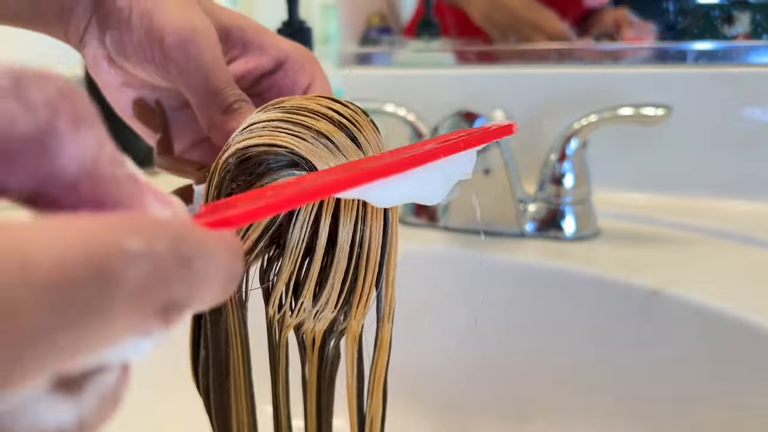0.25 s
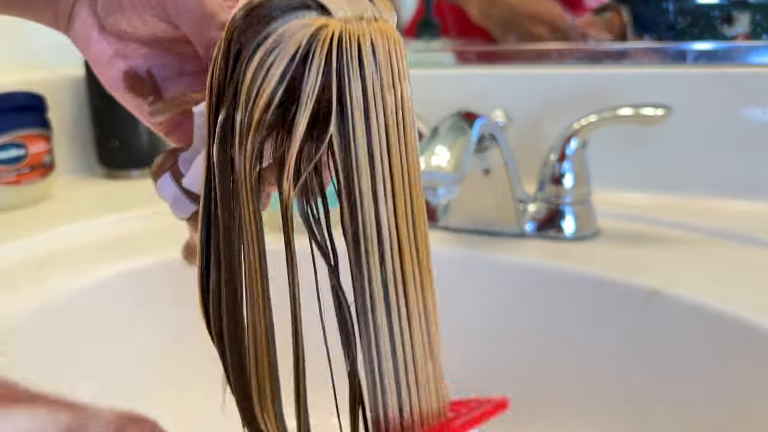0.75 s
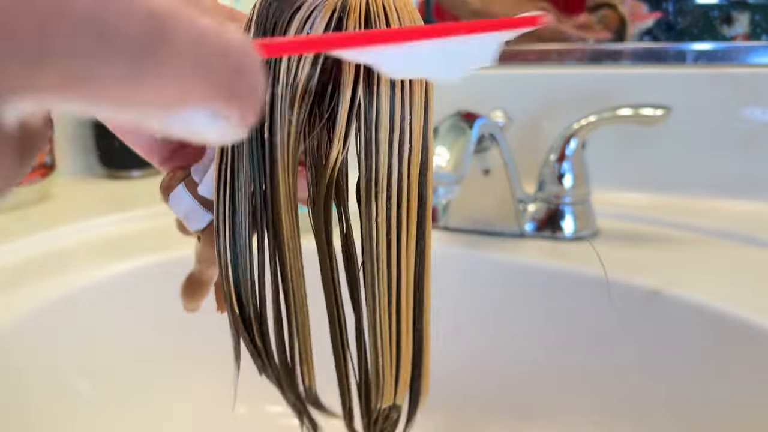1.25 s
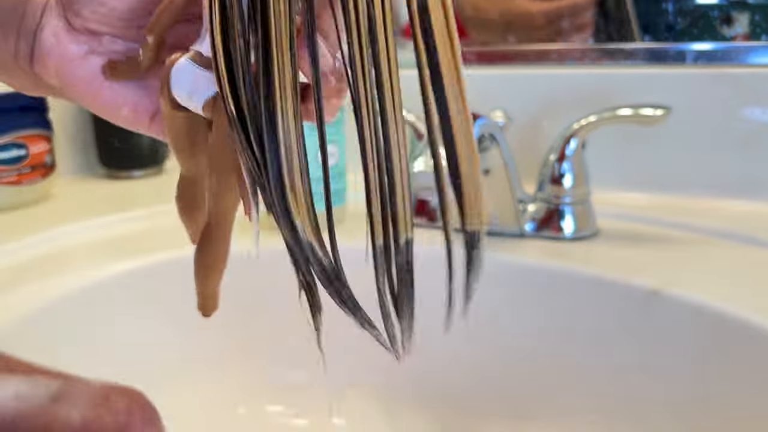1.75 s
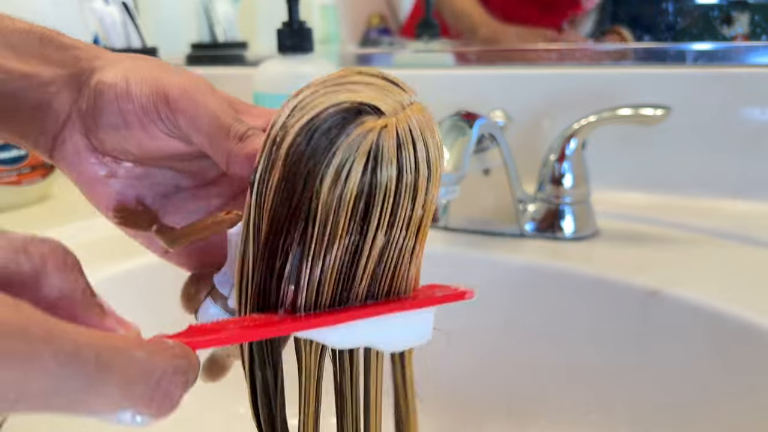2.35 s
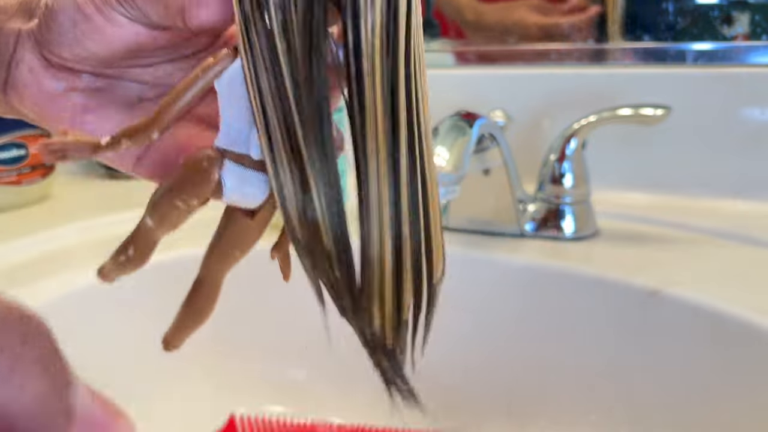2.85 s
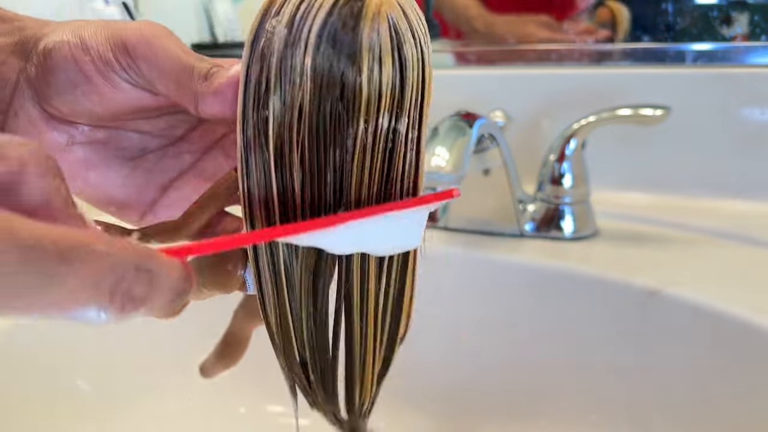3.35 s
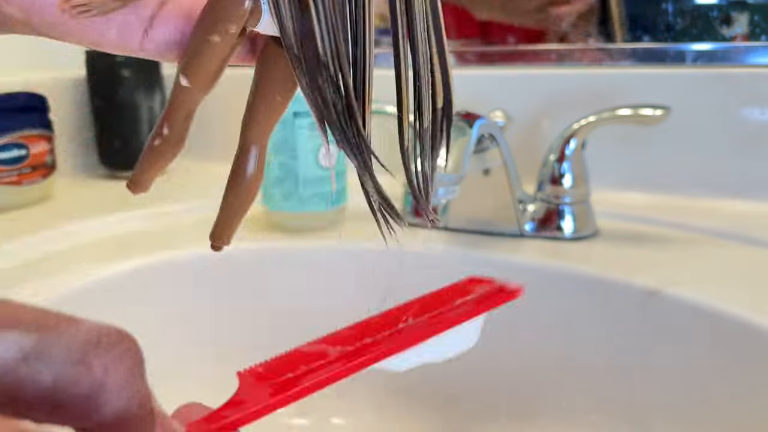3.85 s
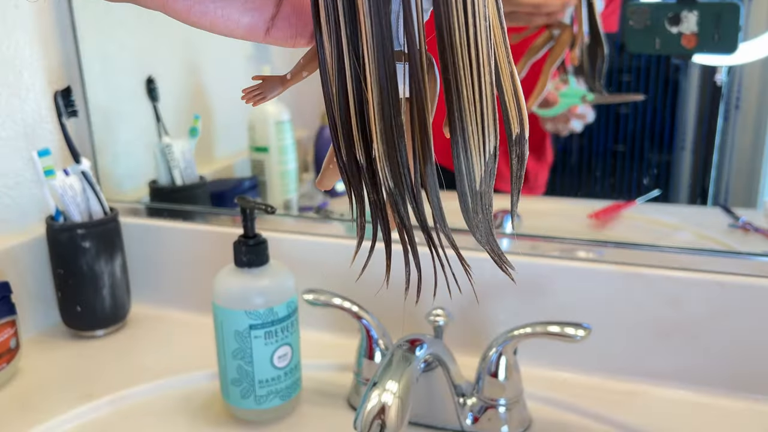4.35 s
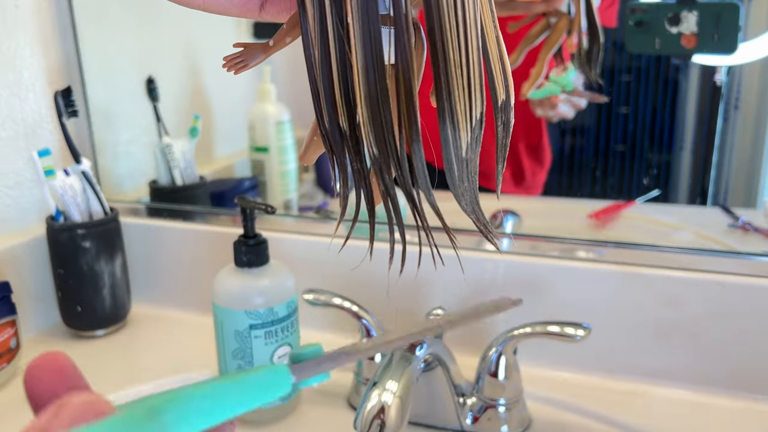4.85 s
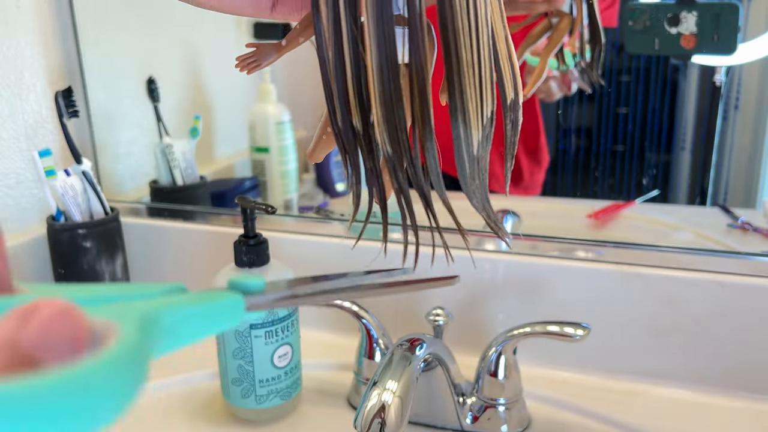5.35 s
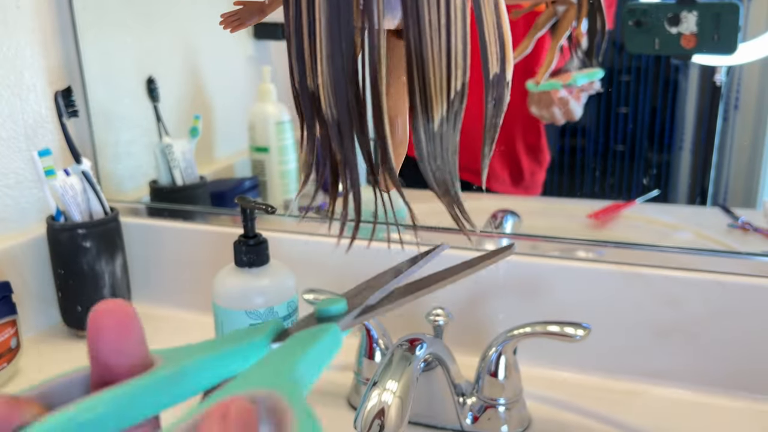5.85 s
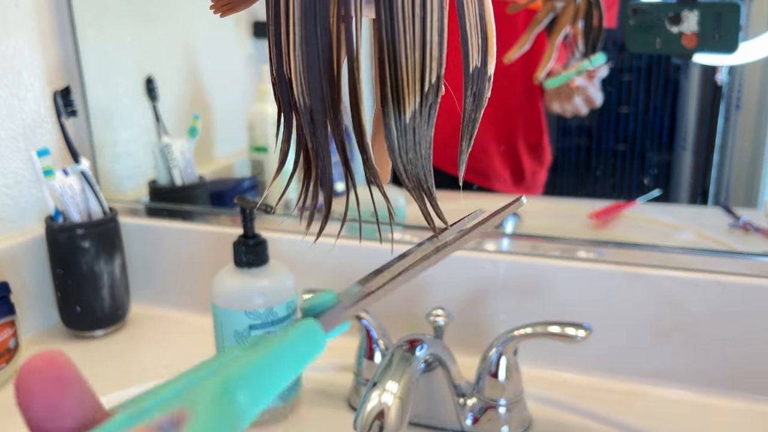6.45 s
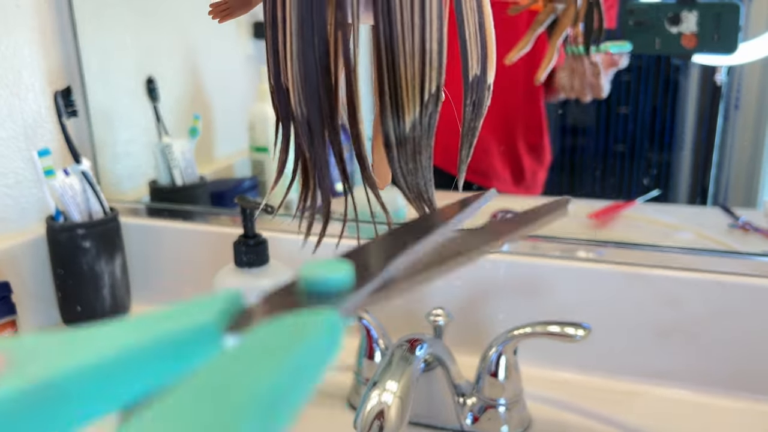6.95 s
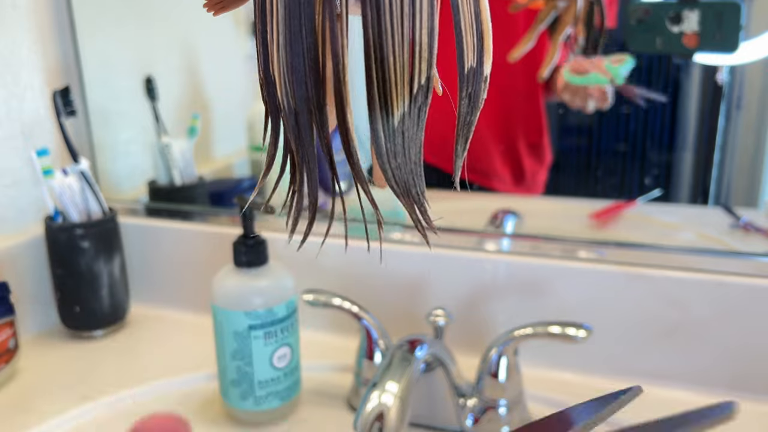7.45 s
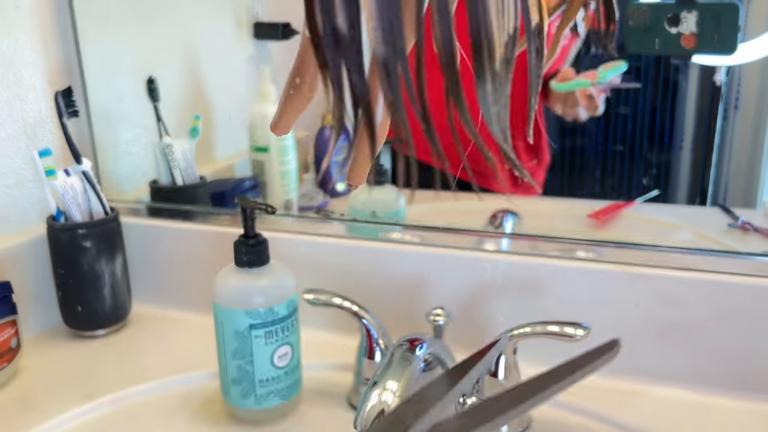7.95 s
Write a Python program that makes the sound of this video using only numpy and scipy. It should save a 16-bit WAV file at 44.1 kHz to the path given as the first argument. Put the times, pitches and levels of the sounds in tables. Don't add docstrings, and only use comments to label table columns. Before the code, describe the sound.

Close stereo phone microphone at a sink, treble leaning left, with airy hiss. Wet synthetic hair fizzes past comb teeth in four strokes, each beginning with crackly snags and swelling into a long swish. A sudden cut raises the low drone. Steel scissors then rub, click open and snip crisply three times, dry and very short, with handle creaks. Near the end, a low thump leads into a brief muffled rumble.

```python
import sys
import numpy as np
from scipy import signal
from scipy.fft import rfft, irfft, next_fast_len
from scipy.io import wavfile
from scipy.ndimage import uniform_filter1d

SR = 44100
rng = np.random.default_rng(int(sys.argv[2]) if len(sys.argv) > 2 else 0)


def master(y):
    cut = np.clip(np.atleast_2d(y).T, -1, 1)
    pcm = np.round(cut * 32767)
    wavfile.write(sys.argv[1], SR, pcm.astype(np.int16))


def makeup_ratio(level_db):
    decades = np.asarray(level_db, float) / 20
    return 10 ** decades


N = 361175
T = np.arange(N) / SR

CHANGE_S = 3.915
GAP_S = (.085, .128, .158, .195)

# (frequency [Hz], width [Hz], level [dB])
HUM_MODES = [
    [(32, 5.2, -19), (57.2, 15, -6.5), (79, 13, -10.5), (98, 3.4, -25), (117.8, 8.6, 5.5),
     (139.3, 12.5, -6), (178, 46, -34.5), (263, 49, -40.5)],
    [(66, 12, -25.5), (101.3, 27, -13), (123.1, 18, -10.5), (166.7, 16, -10), (215.3, 12, -11),
     (243, 10, 2), (273.8, 18, -8.5), (324, 25, -26.5)],
]
# (time [s], level [dB])
HUM_LEVEL = [
    [(0, -50), (.25, -47.5), (.55, -51), (1.2, -47.5), (1.85, -52), (2.2, -50), (3.0, -47.5), (3.6, -51),
     (3.8, -48.5)],
    [(3.92, -49.5), (4.9, -48.5), (5.15, -49.5), (5.45, -47.5), (6.2, -50), (6.85, -49.5), (7.0, -51),
     (7.55, -45), (8.19, -45)],
]
# (frequency [Hz], level [dB per Hz])
AIR_COLOUR = [
    [(120, -22), (200, -0.5), (294, -1.5), (387, -8), (696, -16), (968, -20), (1350, -24.5), (2090, -26.5),
     (2330, -28.5), (10100, -31.5), (16000, -30.5)],
    [(200, -26.5), (330, -10), (600, -10), (960, -22), (1600, -26), (3000, -33), (5200, -37.5),
     (10000, -40.5), (16000, -41.5)],
]
AIR_DB = -78, -73.5
# (frequency [Hz], likeness [0 to 1])
LIKENESS = [(60, 0.68), (180, 0.79), (550, 0.66), (1650, 0.14), (4970, 0.09), (15000, 0.45)]

# (time [s], peak [dB], frequency [Hz], time to fade by 60 dB [s])
THUMPS = [
    (5.17, -32.5, 86.5, .3),
    (7.479, -28.5, 91.8, 0.44),
]
# (time [s], level [dB])
RUMBLE = [
    (7.48, -76.5),
    (7.627, -51.5),
    (7.66, -58.5),
    (7.7, -52.5),
    (7.96, -54),
    (8.171, -59),
]
# (time [s], level [dB])
RUMBLE_TREBLE = [
    (7.62, -26.5),
    (7.82, -19.5),
    (8.17, -29),
]
# (frequency [Hz], width [Hz], level [dB])
WALL_MODES = [(225.2, 62, -2), (338.8, 7.6, -4), (424, 170, -9), (525.7, 28, 4), (580, 20, -8.5),
              (624, 107, -5.5), (765, 74, -19), (875, 30, -12.5), (1130, 170, -24), (1354, 66, -17),
              (1620, 760, -32), (2754, 82, -33)]

# (time [s], rub [dB], rise per 20 dB [s], fall per 20 dB [s], handle creak [dB])
SLIDES = [(4.362, -81.5, 0.5, 0.2, 0), (4.836, -64, 0.05, 0.1, -16), (4.864, -56.5, 0.03, 0.03, -10.5),
          (5.396, -56, 0.04, 0.02, -3), (5.862, -79.5, 0.07, .04, 0), (6.37, -81, 0.2, 0.2, -3),
          (6.626, -59, .018, 0.06, 1.5), (6.864, -73.5, 0.02, 0.1, -5), (7.262, -78, 0.1, 0.17, 11),
          (7.302, -57.5, 0.02, 0.02, 6), (7.435, -74.5, 0, 0.1, 12.5)]
# (time [s], rub [dB], handle creak [dB])
NICKS = [
    (5.376, -61, -4),
    (7.28, -60, 9),
]
# (time [s], peak [dB], handle creak [dB], time to fade by 60 dB [s])
OPENINGS = [
    (4.4079, -38.5, -34, .079),
    (4.94, -41.5, -16.5, 0.088),
    (5.4921, -37.5, -21.5, 0.083),
    (6.7467, -41, -12.5, 0.082),
    (7.417, -40.5, -9, 0.1),
]
# (time [s], peak [dB], handle knock [dB], extra steel ring [dB, half of it counts], tips
# [dB])
SNIPS = [
    (5.3986, -14, -21.5, 10.5, -23.5),
    (6.6314, -9, -24, 0.5, -28),
    (7.306, -14.5, -14, 10.5, -34),
]
# (frequency [Hz], level [dB], time to fade by 60 dB [s])
BLADE_MODES = [(4230, -17, 0.04), (5542, -12, 0.039), (6550, -15.5, 0.005), (8660, -7.5, 0.017),
               (10140, -3, 0.03), (11100, 5.5, 0.012), (13200, -5, .03), (14400, -1, .012)]
# (frequency [Hz], level [dB per Hz])
STEEL_COLOUR = [(710, -49.5), (1200, -15.5), (2080, -9.5), (2450, -3.5), (4990, -5.5), (5570, -4),
                (9330, -17), (12100, -10.5), (16000, -10.5), (16500, -31)]

# (time [s], peak [dB], ring [Hz], knock [dB], knock [Hz])
CATCHES = [(.3668, -54.5, 8300, -21, 579), (0.4544, -47.5, 4440, -16, 452), (1.2845, -51, 6100, -18, 680),
           (1.325, -41, 6350, -30, 2460), (1.3547, -46.5, 6270, -1, 1590), (2.1509, -39.5, 4460, -12, 1860),
           (2.2483, -49, 7400, -6, 1850), (2.2615, -43, 8400, 1.5, 1860), (2.3413, -55, 5330, -9, 1320),
           (3.126, -46.5, 5760, -10.5, 708), (3.1547, -31.5, 6530, -39, 1850),
           (3.24, -37.5, 6440, -2, 1550), (3.376, -56, 15200, 6, 1660), (4.4158, -31, 12000, -43, 2200),
           (4.8327, -44.5, 4340, -8, 573), (5.6238, -66, 12600, -8, 686), (6.571, -59.5, 4650, 7.5, 680),
           (7.622, -59, 10700, -7, 528), (7.86, -61, 4360, 11, 580)]
# (time [s], peak [dB], ring [Hz])
DRIPS = [(.2494, -63.5, 3460), (.3262, -63, 8600), (.3936, -53.5, 8100), (0.4117, -64, 6560),
         (.5586, -56, 8690), (.5844, -50, 6450), (.9911, -72, 7610), (1.1209, -65, 11800),
         (1.8694, -66.5, 8600), (2.712, -63.5, 7200), (2.744, -62.5, 4790), (2.8015, -60.5, 12200),
         (2.823, -69, 3400), (2.9482, -70, 3360), (3.7423, -50.5, 13700), (3.8581, -76, 3010),
         (3.924, -59.5, 7000), (4.0003, -62, 5100), (4.2105, -57, 12200), (4.572, -60, 8400),
         (4.766, -58, 5800)]

# (frequency [Hz], level [dB per Hz])
HAIR_COLOUR = [(900, -39), (2000, -11.5), (3700, -4.5), (5500, -5.5), (7700, -3), (9500, -1.5),
               (12000, -37)]
# (time [s], drag [dB], rise per 20 dB [s], fall per 20 dB [s], comb body [dB])
SNAGS = [
    (.4, -72, .065, 0.06, -20),
    (.48, -62, 0.13, 0.15, -7.5),
    (1.279, -65.5, .014, 0.09, -8),
    (2.142, -74, 0.03, 0.1, -31),
    (2.2, -75, 0.14, .04, -22),
    (3.121, -66, .025, -0.01, -12),
    (2.25, -70.5, 0.08, 0.09, 0),
]
# (time [s], drag [dB], fall per 20 dB [s], comb body [dB])
BREAKS = [
    (1.282, -63, 0.29, -8),
    (1.324, -59, 0.1257, -18),
    (2.152, -60.5, 0.16, -18),
    (2.26, -62.5, 0.1148, -5),
    (3.127, -68.5, 0.36, -9),
    (3.153, -60.5, 0.15, -13),
    (3.24, -62.5, 0.04, 3),
    (3.378, -67.5, 0.26, -10),
]
# (start [s], fastest [s], end [s], drag [dB])
PULLS = [
    (0.545, 0.678, 0.84, -65.5),
    (0.781, 0.887, 0.937, -67.5),
    (1.44, 1.604, 1.71, -59),
    (2.31, 2.535, 2.64, -62),
    (3.36, 3.513, 3.63, -63.5),
]
# (time [s], peak [dB], time to fade by 60 dB [s])
THUDS = [
    (0.38, -55, 0.063),
    (0.455, -56.5, 0.11),
    (1.284, -51.5, 0.091),
    (2.152, -52.5, 0.08),
    (3.154, -60, 0.06),
    (3.236, -60, 0.19),
]
# (low edge [Hz], high edge [Hz])
EMPTY_HZ = [
    (9650, 10850),
    (13150, 14400),
    (15800, 22000),
]


def evened(x):
    return x / np.sqrt(np.mean(x ** 2) + 1e-20)


def read(points, hz):
    f, value = np.transpose(points)
    return np.interp(np.log(hz + 1), np.log(f + 1), value)


def coloured(x, gain):
    size = next_fast_len(x.shape[-1], True)
    spectrum = rfft(x, size) * gain(np.fft.rfftfreq(size, 1 / SR))
    return irfft(spectrum, size)[..., :x.shape[-1]]


def band(x, lo, hi):
    return signal.sosfilt(signal.butter(2, [lo, hi], "band", fs=SR, output="sos"), x)


def modal(modes):
    def gain(hz):
        return np.sqrt(sum(makeup_ratio(2 * db) / (1 + (2 * (hz - f) / w) ** 2) ** 2 for f, w, db in modes))
    return evened(coloured(rng.standard_normal(N), gain))


def add(mix, s, sound):
    part = mix[round(s * SR):][:len(sound)]
    part += sound[:len(part)]


def placed(x, left_db, lag, wet_db, t60):
    def ears(hz):
        delay = np.exp(-2j * np.pi * np.outer([lag, 0], hz) / SR)
        shaded = left_db / (1 + (1790 / (hz + 1)) ** 2)
        shaded = shaded / (1 + (hz / 13070) ** 4)
        return delay * makeup_ratio(np.outer([.5, -.5], shaded))

    t = T[:6000]
    tails = rng.standard_normal((3, 2, len(t))) * makeup_ratio(-60 * t / t60) * (t > .0015)
    out = coloured(np.array([x, x]), ears)
    for k, tail in enumerate(tails / np.linalg.norm(tails[0])):
        share = np.cos(2 * np.pi * (7.3 * T + k / 3))
        out += makeup_ratio(wet_db) * signal.oaconvolve((x * share)[None], tail, axes=1)[:, :N]
    return out


def swells(rows):
    s, db, rise, fall, extra_db = np.transpose(rows)[:, :, None]
    t = T[::16]
    before = (s - t) / np.maximum(rise, .002)
    after = (t - s) / np.maximum(fall, .002)
    gain = makeup_ratio(db - 20 * np.maximum(before, after))
    return np.interp(T, t, gain.sum(0)), np.interp(T, t, (gain * makeup_ratio(extra_db)).sum(0))


def room_tone():
    def same(hz):
        return np.clip(read(LIKENESS, hz), 0, 1)

    out = np.zeros((2, N))
    second = np.interp(T, [CHANGE_S - .004, CHANGE_S + .004], [0, 1])
    for k, shot in enumerate((1 - second, second)):
        hum = modal(HUM_MODES[k])
        hum = evened(hum / uniform_filter1d(hum ** 2, 5000) ** 0.21)
        hum *= makeup_ratio(np.interp(T, *np.transpose(HUM_LEVEL[k])))
        side = modal(HUM_MODES[k]) * makeup_ratio(-75.5)
        a, b = rng.standard_normal((2, N))
        right = coloured(a, same) + coloured(b, lambda hz: np.sqrt(1 - same(hz) ** 2))
        air = coloured(np.array([a, right]), lambda hz: makeup_ratio(read(AIR_COLOUR[k], hz)))
        air *= makeup_ratio(AIR_DB[k]) / np.std(band(air[0], 400, 9000))
        out += shot * (hum * makeup_ratio([[-.4], [.4]]) + side * np.array([[1], [-1]]) + air)
    return out


def next_door():
    thumps, t = np.zeros(N), T[:SR // 2]
    for s, db, hz, t60 in THUMPS:
        soft_start = 1 - np.exp(-(t / 0.029) ** 2)
        add(thumps, s, makeup_ratio(db - 60 * t / t60) * soft_start * np.sin(2 * np.pi * hz * t))
    s, roll_db = np.transpose(RUMBLE)
    wall = modal(WALL_MODES)
    wall /= np.std(band(wall, 330, 1600))
    treble = coloured(rng.standard_normal(N),
                      lambda hz: 1 / (1 + (hz / 2600) ** 4.2) / (1 + (1200 / (hz + 1)) ** 4))
    treble = evened(treble) * makeup_ratio(np.interp(T, *np.transpose(RUMBLE_TREBLE)))
    rolling = (wall + treble) * makeup_ratio(np.interp(T, s, roll_db, left=-130))
    return thumps + placed(rolling, -0.4, 0, -2.8, 0.049)


def blade_rub(mid, high, creak):
    nicks = [(s, db, .004, .014, creak_db) for s, db, creak_db in NICKS]
    slide, slide_creak = swells(SLIDES + nicks)
    rub = slide * (band(mid, 1300, 5000) + high * makeup_ratio(-7.5)) + slide_creak * creak
    for s, db, creak_db, t60 in OPENINGS:
        stroke = np.clip((T - s) / .002 + 0.47, 0, 1) ** 2
        stroke *= makeup_ratio(db - 8.5 - 60 * np.clip(T - s - 0.0058, 0, 1) / t60)
        stroke *= 1 + 0.95 * np.exp(-abs(T - s) / 0.0018)
        rub += stroke * (mid + high * makeup_ratio(-8.5) + creak * makeup_ratio(creak_db))
    return rub


def blade_snips(mid, high):
    out, t = np.zeros(N), T[:4000]
    all_phases = rng.random((len(SNIPS), len(BLADE_MODES)))
    for (s, db, knock_db, left_db, tips_db), phases in zip(SNIPS, all_phases):
        crack = np.exp(-t / 0.00048) + 0.34
        ring = sum(makeup_ratio(d - 60 * t / t60) * np.sin(2 * np.pi * (f * t + p))
                   for (f, d, t60), p in zip(BLADE_MODES, phases))
        knock = np.sin(2 * np.pi * 850 * t) * makeup_ratio(-60 * t / 0.01)
        knock += .5 * np.sin(2 * np.pi * 500 * t) * makeup_ratio(-60 * t / 0.0083)
        rattle = (high + 0.47 * mid)[round(s * SR):][:len(t)] * makeup_ratio(-14 - 60 * t / 0.038)
        contact = band(rng.standard_normal(len(t)) * np.exp(-t / 0.00047), 3300, 16500)
        steel = band(ring * crack + 0.88 * contact + rattle, 1900, 18000)
        snip = makeup_ratio(db - 11.5 + .5 * left_db) * steel + makeup_ratio(db + knock_db) * band(knock, 300, 3000)
        add(out, s + 0.00041, snip)
        tips = np.sin(2 * np.pi * 4400 * t[:160]) * np.hanning(160)
        add(out, s - .0025, makeup_ratio(db + tips_db) * tips)
    return out


def scissors():
    grit = rng.standard_normal(N) * makeup_ratio(3.0 * np.minimum(rng.exponential(1, N), 5))
    steel = coloured(grit, lambda hz: makeup_ratio(read(STEEL_COLOUR, hz)))
    mid, high = evened(band(steel, 1700, 13000)), evened(band(steel, 9400, 12000))
    creak = evened(band(grit, 610, 1200))
    rub = blade_rub(mid, high, creak)
    snips = blade_snips(mid, high)
    return placed(snips, 11, -6.0, -15.5, 0.12) + placed(rub, 7.6, -6.0, -5.5, 0.026)


def ticks():
    out, t = np.zeros(N), T[:5000]
    rows = CATCHES + [(*row, -23, 470) for row in DRIPS]
    noises = rng.standard_normal((len(rows), 2, len(t)))
    for (s, db, hz, low_db, low_hz), (a, b) in zip(rows, noises):
        ping = 1.9 * np.cos(2 * np.pi * hz * t) * np.exp(-t / 0.00044)
        fizz = evened(band(a, 0.64 * hz, min(1.21 * hz, 17000))) + 0.6 * evened(band(a, 2500, 13000))
        t60 = 0.029 if db > -47 else 0.052
        fizz *= .5 * np.exp(-t / 0.0011) + 0.12 * makeup_ratio(-60 * t / t60)
        knock = 0.77 * evened(band(b, 0.55 * low_hz, 1.32 * low_hz)) * makeup_ratio(-60 * t / 0.024)
        knock += 1.55 * np.cos(2 * np.pi * low_hz * t) * np.exp(-t / 0.00087)
        add(out, s, makeup_ratio(db - 4) * (ping + fizz + makeup_ratio(low_db) * knock))
    return placed(out, 7.5, -6.0, -3.5, 0.069)


def doll_bumps():
    out, t = np.zeros(N), T[:4000]
    for (s, db, t60), noise in zip(THUDS, rng.standard_normal((len(THUDS), len(t)))):
        add(out, s, makeup_ratio(db - 4.0 - 60 * t / max(t60, .01)) * evened(band(noise, 195, 460)))
    return out


def pulls():
    drag, treble = np.zeros((2, N))
    for start, top, end, db in PULLS:
        up = np.clip((top - T) / (top - start), 0, 1)
        down = np.clip((T - top) / (end - top), 0, 2)
        gain = makeup_ratio(db - 17 * up ** 1.5 - 35 * down ** 2.4) * np.clip((T - start) / 0.035, 0, 1)
        drag += gain
        treble += gain * makeup_ratio(np.interp(T, [start, end], (-10, -3)))
    return drag, treble


def strand_snaps():
    clumps = makeup_ratio(0.81 * evened(uniform_filter1d(rng.standard_normal(N), 200)))
    bursts = makeup_ratio(4.0 * np.minimum(rng.exponential(1, (3, N)), 6))
    middle, left, right = rng.standard_normal((3, N)) * bursts * clumps
    snaps = np.array([np.roll(middle, -6) + 1.52 * left, middle + 1.52 * right])
    z = signal.stft(snaps, nperseg=256)[2]
    patches = uniform_filter1d(uniform_filter1d(rng.standard_normal(z.shape[1:]), 9, 0), 12, 1)
    z = z * makeup_ratio(2.3 * evened(patches))
    return signal.istft(z, nperseg=256)[1][:, :N]


def comb():
    snaps = strand_snaps()
    hiss = evened(coloured(snaps, lambda hz: makeup_ratio(read(HAIR_COLOUR, hz))))
    body = evened(band(snaps, 1060, 2670))
    fizz = evened(band(band(snaps, 8900, 17000), 8900, 17000)) * makeup_ratio(4)
    breaks = [(s, db, .004, *rest) for s, db, *rest in BREAKS]
    snag, snag_body = swells(SNAGS + breaks)
    pull, pull_treble = pulls()
    out = hiss * (snag + pull)
    out += body * (snag_body + pull * makeup_ratio(-15))
    out += fizz * (snag * makeup_ratio(-9) + pull_treble)
    out *= makeup_ratio(2.5 + np.array([[1.2], [-1.2]]))
    return out + doll_bumps()


def scene():
    return room_tone() + next_door() + scissors() + ticks() + comb()


def roll_off(x):
    return signal.sosfilt(signal.butter(12, 17010, fs=SR, output="sos"), x)


def record(dry):
    dry = .42 * np.tanh(dry / .42)
    x = dry * np.interp(T, GAP_S, [1, 0.0068, 0.0032, 1])
    hz, t, z = signal.stft(x, SR, nperseg=1024)
    column_hz = hz[:, None]
    first_shot = t < CHANGE_S
    shift_hz = np.repeat(rng.choice([-170, 0, 0, 340], (len(t) // 4 + 1, 2)), 4, 0)[:len(t)].T
    empty = sum((column_hz > lo - shift_hz[0]) & (column_hz < hi + shift_hz[1]) for lo, hi in EMPTY_HZ)
    sharp = sum(abs(t - s) < .006 for s, db, *_ in CATCHES + DRIPS if db > -44 or 3.7 < s)
    z *= np.where((empty > 0) & first_shot & (sharp == 0), makeup_ratio(-40), 1)
    joined = -z[1] * np.exp(-2j * np.pi * column_hz * 13 / SR)
    tied = (column_hz > EMPTY_HZ[0][1]) & first_shot
    z[0] = np.where(tied, .72 * joined + 0.51 * z[0], z[0])
    z *= 1 / (1 + (column_hz / 16100) ** 60)
    level_db = 10 * np.log10((abs(z[:, hz > 14500]) ** 2).mean((0, 1)) + 1e-20)
    edge_hz = 14500 + 900 * rng.random(len(t))
    z *= np.where((level_db < -112) & (column_hz > edge_hz), makeup_ratio(-31), 1)
    return roll_off(signal.istft(z, SR, nperseg=1024)[1][:, :N])


dry = scene()
out = record(dry)
master(out)
```